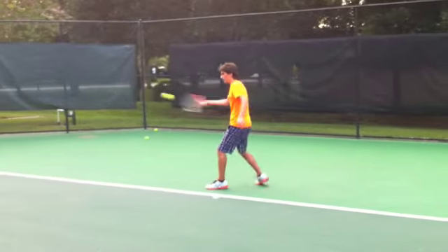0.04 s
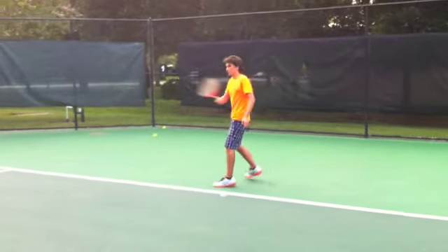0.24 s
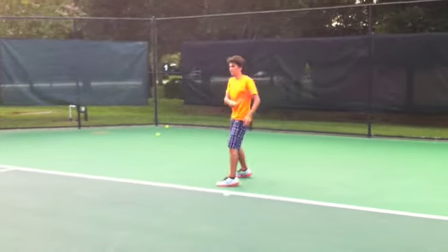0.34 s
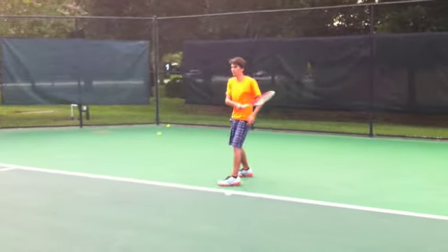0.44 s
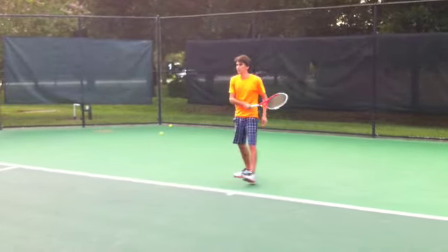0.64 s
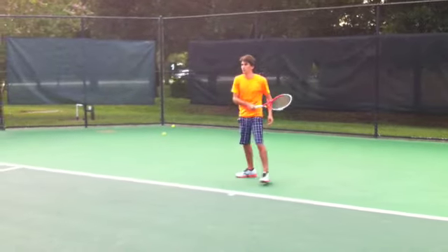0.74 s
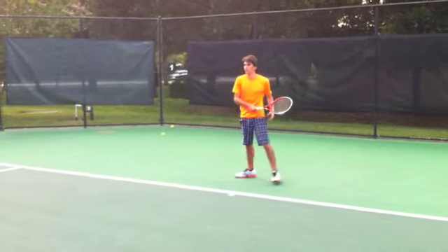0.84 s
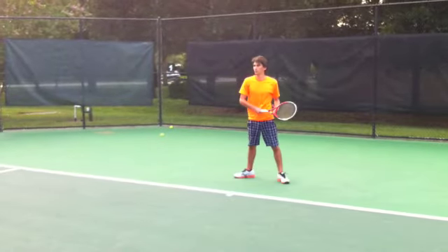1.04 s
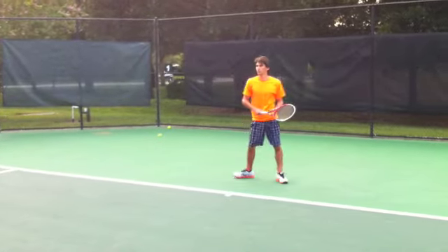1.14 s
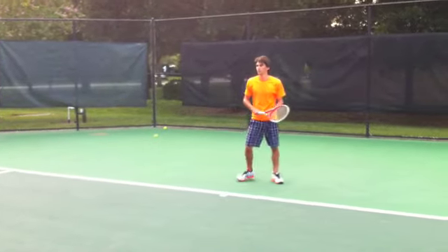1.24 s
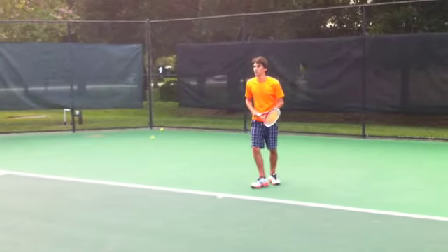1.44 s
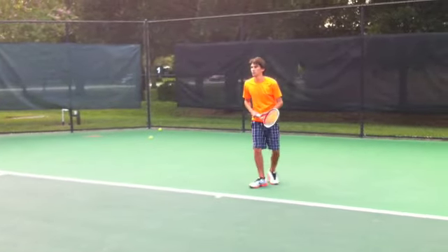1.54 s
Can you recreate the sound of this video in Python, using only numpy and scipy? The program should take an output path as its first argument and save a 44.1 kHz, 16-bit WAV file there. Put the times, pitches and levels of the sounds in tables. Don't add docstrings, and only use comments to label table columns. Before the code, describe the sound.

One crisp racket-on-ball strike rings across an open court, followed by faint gritty shoe scuffs

```python
import sys
import numpy as np
from scipy import signal
from scipy.fft import rfft, irfft
from scipy.io import wavfile
from scipy.ndimage import uniform_filter1d

SR = 44100
rng = np.random.default_rng(int(sys.argv[2]) if len(sys.argv) > 2 else 0)


def unload_audio(sound):
    columns = np.transpose(np.atleast_2d(sound))
    steps = np.round(np.clip(columns, -1, 1) * 32767)
    wavfile.write(sys.argv[1], SR, steps.astype(np.int16))


def undo_db(level):
    steps = np.asarray(level, float) / 20
    return 10 ** steps


N = 70560

# f/Hz, level/dB
TRAFFIC_COLOUR = [(30, -73), (70, -28.5), (179, -4.5), (300, -17.5), (900, -17.5), (2000, -25),
                  (5000, -35.5), (15500, -40)]
# f/Hz, width/Hz, level/dB
TRAFFIC_HUMPS = [(926, 1200, -61), (241, 64, -64.5), (121.5, 62, -66)]
# t/s, f/Hz, level/dB
DRONE_PATH = [
    (0, 186.3, -58.5),
    (.8, 185.8, -61),
    (1.25, 180, -57.5),
    (1.6, 187.3, -57),
]
# f/Hz, width/Hz, level/dB
INSECT_BANDS = [(7220, 600, -74.5), (5110, 930, -72.5), (9730, 240, -81.5)]
# t/s, f/Hz, level/dB
BIRD_PATH = [
    (.69, 3740, -82),
    (.74, 3715, -67),
    (.775, 3700, -78),
    (.81, 3680, -68.5),
    (.89, 3580, -70),
    (.95, 3535, -75),
    (1.0, 3500, -80),
]
# start t/s, rise t/s, time to fall 60 dB t/s, level/dB, share that rings the sole (0-1)
SHOE_SCUFFS = [
    (.005, 0.015, 0.32, -45.5, 0.06),
    (.444, 0.016, 0.4, -40.5, 0.16),
    (.485, 0.026, 0.16, -49.5, 1),
    (.55, 0.031, 0.59, -49.5, 0.4),
    (.95, 0.055, 0.72, -49, 0.02),
    (1.548, 0.032, 0.13, -36, 0.95),
]
# f/Hz, level/dB
DRAG_COLOUR = [(710, -22), (1200, -12.5), (1340, 12), (1750, 13), (2130, 0), (6030, 2), (16000, -17.5)]
# f/Hz, width/Hz, level/dB
SOLE_RESONANCES = [(2360, 230, 6.5), (2935, 280, 6.5), (3890, 290, 4), (8600, 630, -7.5),
                   (12500, 1700, -15)]
# f/Hz, level/dB
HEEL_COLOUR = [(200, -20), (450, 8), (1800, -13), (3000, -3), (6000, -32)]
# t/s, tick peak level/dB, ring level/dB
FAR_BOUNCES = [
    (1.0842, -42.5, -44.5),
    (1.14, -51, -54),
]
# f/Hz, level/dB, time to fall 60 dB t/s
BOUNCE_MODES = [(219, 5.5, 0.033), (976, 1, 0.026), (1870, -1, 0.017)]
# f/Hz, level/dB
TICK_COLOUR = [(500, 7.5), (1500, 6), (3500, -9.5), (6200, -6.5), (8000, -7), (9600, -7), (16000, -21)]
# f/Hz, level/dB
FENCE_COLOUR = [(800, -20), (2000, 5), (5000, -3.5), (10000, -9), (16000, -14)]
# delay t/s, level/dB
HIT_ECHOES = [(.036, -27), (.064, -34), (0.094, -31), (0.129, -30.5), (.142, -30), (0.189, -26.5),
              (0.226, -29.5)]
# f/Hz, time to fall 60 dB t/s
COURT_FALL = [(200, 1), (1000, 0.81), (3000, .5), (12000, 0.36)]
# f/Hz, level/dB
SIDEWAYS_COLOUR = [(150, -25), (300, -1.5), (550, -10.5), (850, -4), (1100, 4.5), (1350, -9.5), (1700, -6),
                   (2500, -27)]
# f/Hz, level/dB
CRACK_COLOUR = [(500, -8), (1000, 1.5), (1700, -3), (3000, -5), (5000, -11), (8000, -16), (12000, -25.5),
                (16000, -30)]
# f/Hz, peak level/dB, time to fall 60 dB t/s
RACKET_MODES = [(225, -26, .05), (1566, -36.5, .12), (1922, -36, .035), (2121, -48, .08), (2250, -37, .03),
                (2640, -41, .025), (2960, -45, .025), (3400, -44, .02), (4570, -47, .02)]
# f/Hz, peak level/dB, time to fall 60 dB t/s
BALL_MODES = [(1012, -20.5, .02), (1220, -29, .017)]
# f/Hz, peak level/dB, time to fall 60 dB t/s
REBOUND_MODES = [(641, -27, 0.021), (810, -31.5, 0.027)]

HIT_S, LOW_CUT_HZ = 0.2057, 132


def evened(x):
    return x / np.sqrt(np.mean(x ** 2) + 1e-20)


def read(points, hz):
    f, value = np.transpose(points)
    return np.interp(np.log(hz + 1), np.log(f + 1), value)


def add(mix, s, sound):
    part = mix[round(s * SR):][:len(sound)]
    part += sound[:len(part)]


def coloured(x, spectrum):
    gain = undo_db(read(spectrum, np.fft.rfftfreq(len(x), 1 / SR)))
    return evened(irfft(rfft(x) * gain, len(x)))


def resonate(x, hz, width):
    turn = np.exp(2j * np.pi * np.cumsum(hz * np.ones(len(x))) / SR)
    r = np.exp(-np.pi * width / SR)
    return 2 * (turn * signal.lfilter([1 - r], [1, -r], x / turn)).real


def band(hz, width):
    noise = rng.standard_normal(N)
    return evened(resonate(resonate(noise, hz, width), hz, width))


def ring(modes, hold_s=0.):
    t = np.arange(SR // 2) / SR
    out = np.zeros(len(t))
    for hz, db, t60 in modes:
        out += undo_db(db - 60 * np.maximum(t - hold_s, 0) / t60) * np.sin(2 * np.pi * hz * t)
    return np.minimum(t / 0.0006, 1) * out


def burst(spectrum, rise_s, t60, hold_s=0., size=4096):
    t = np.arange(size) / SR
    fall = undo_db(-60 * np.maximum(t - hold_s, 0) / t60)
    return coloured(rng.standard_normal(size), spectrum) * np.minimum(t / rise_s, 1) * fall


def low_cut(x, hz, order=4):
    return signal.sosfilt(signal.butter(order, hz, "high", fs=SR, output="sos"), x)


def traffic():
    frames, hz = N // 256 + 5, np.fft.rfftfreq(1024, 1 / SR)
    a, b, patches = rng.standard_normal((frames, 513, 3)).T
    patches = uniform_filter1d(patches, size=12, axis=0)
    patches = evened(uniform_filter1d(patches, size=12, axis=1))
    cells = (a + 1j * b) * undo_db(read(TRAFFIC_COLOUR, hz)[:, None] + patches)
    wash = signal.istft(cells, nperseg=1024, noverlap=768)[1][:N]
    t, (s, f, db) = np.arange(N) / SR, np.transpose(DRONE_PATH)
    drone = undo_db(np.interp(t, s, db)) * band(np.interp(t, s, f), 21.66)
    humps = sum(undo_db(level) * band(centre, width) for centre, width, level in TRAFFIC_HUMPS)
    return undo_db(-57) * evened(wash) + drone + humps


def insects():
    throb_per_s, peak_s, depth_db = 4.44, 0.21, 2
    t = np.arange(N) / SR
    throb = undo_db(depth_db * (np.cos(2 * np.pi * throb_per_s * (t - peak_s)) - 1))
    return throb * sum(undo_db(db) * band(hz, width) for hz, width, db in INSECT_BANDS)


def bird():
    t, (s, hz, db) = np.arange(N) / SR, np.transpose(BIRD_PATH)
    flutter_db = 3.5 * evened(resonate(rng.standard_normal(N), 40, 25))
    gate = np.clip(np.minimum(t - s[0], s[-1] - t) / 0.0077, 0, 1)
    tone = np.sin(2 * np.pi * np.cumsum(np.interp(t, s, hz)) / SR)
    return np.sqrt(2) * gate * undo_db(np.interp(t, s, db) + flutter_db) * tone


def shoes():
    grit_per_s = 6000
    grit = (rng.random(N) < grit_per_s / SR) * undo_db(1.6 * rng.exponential(1, N)) * rng.choice([-1, 1], N)
    grit = evened(grit) + 0.85 * rng.standard_normal(N)
    plain = coloured(grit, [(300, -19)] + list(DRAG_COLOUR))
    rung = evened(sum(undo_db(db) * resonate(grit, hz, width) for hz, width, db in SOLE_RESONANCES))
    t, out = np.arange(N) / SR, np.zeros(N)
    for s, rise, t60, db, share in SHOE_SCUFFS:
        u = t - s
        swell = np.sin(np.pi / 2 * np.clip(u / rise, 0, 1)) ** 2
        fall = undo_db(db - 14 - 60 * np.maximum(u - rise, 0) / t60)
        out += swell * fall * (np.sqrt(1 - share) * plain + np.sqrt(share) * rung)
    return out


def heel():
    out = np.zeros(N)
    add(out, 0.41, undo_db(-57) * burst(HEEL_COLOUR, rise_s=0.012, t60=0.3, hold_s=0.03))
    return out


def bounces():
    out = np.zeros(N)
    for s, tick_db, ring_db in FAR_BOUNCES:
        add(out, s, undo_db(tick_db) * burst(TICK_COLOUR, rise_s=0.00021, t60=0.013, hold_s=0.0011))
        add(out, s, undo_db(ring_db) * ring(BOUNCE_MODES))
    return low_cut(out, LOW_CUT_HZ)


def fence():
    out = np.zeros(N)
    hiss = burst(FENCE_COLOUR, rise_s=0.004, t60=0.17, size=16384)
    add(out, HIT_S + 0.033, undo_db(-53) * hiss)
    return out


def court(x):
    taps = np.zeros(SR)
    for delay, db in HIT_ECHOES:
        smear = rng.standard_normal(200) * np.exp(-np.arange(200) / 5)
        add(taps, delay, undo_db(db) * smear / np.linalg.norm(smear))
    hz, t, z = signal.stft(rng.standard_normal(SR), SR, nperseg=256)
    z = z * undo_db(-60 * t / read(COURT_FALL, hz)[:, None])
    tail = signal.istft(z, SR, nperseg=256)[1][:SR - 1000]
    add(taps, 0.018, undo_db(-19.5) * tail / np.linalg.norm(tail))
    return signal.fftconvolve(x, taps)[:N]


def sideways_hit():
    out = np.zeros(N)
    add(out, HIT_S, undo_db(-23.5) * burst(SIDEWAYS_COLOUR, rise_s=0.0012, t60=0.021, hold_s=0.005))
    return out


def strings():
    out, t = np.zeros(N), np.arange(SR // 2) / SR
    swell_s = 0.052
    swell = 0.54 + 0.65 * np.minimum(t / swell_s, 1) ** 2
    add(out, HIT_S, swell * ring([(613, -44, 0.28)], swell_s))
    return out


def hit():
    contact_s, ground_delay_s = 0.004, 0.0046
    out = np.zeros(N)
    crack = undo_db(-29) * burst(CRACK_COLOUR, rise_s=0.00023, t60=0.039, hold_s=0.0012)
    add(out, HIT_S, crack + ring(RACKET_MODES)[:len(crack)])
    add(out, HIT_S + ground_delay_s, undo_db(-15.5) * crack)
    pop = ring(BALL_MODES, hold_s=0.0057) + ring(REBOUND_MODES, hold_s=0.0036)
    add(out, HIT_S + contact_s, -pop)
    return low_cut(out, LOW_CUT_HZ)


def scene():
    strike = hit()
    reflected = court(0.5 * strike + sideways_hit())
    background = traffic() + insects() + bird()
    player = shoes() + heel()
    return (background + player + bounces() + fence() + reflected + strings() + strike)[None]


def band_limit(x):
    return signal.sosfilt(signal.butter(12, 16400, fs=SR, output="sos"), x)


def record(dry):
    x, t = low_cut(dry, 60, order=2), np.arange(N) / SR
    dull = signal.sosfiltfilt(signal.butter(8, 2200, fs=SR, output="sos"), x)
    dull_from_s, dull_to_s, fade_s = 0.1965, 0.2025, 0.001
    dullness = np.clip(np.minimum(t - dull_from_s, dull_to_s - t) / fade_s + 1, 0, 1)
    x = x + dullness * (dull - x)
    top_cut = signal.firwin(255, 15900, window=("kaiser", 8), fs=SR)[None]
    mix = signal.oaconvolve(x, top_cut, "same")
    return band_limit(mix)


dry = scene()
out = record(dry)
unload_audio(out)
```